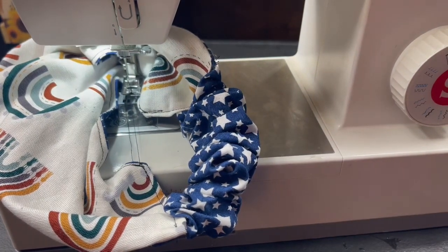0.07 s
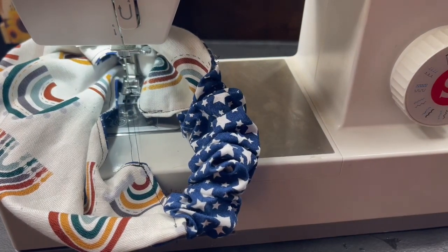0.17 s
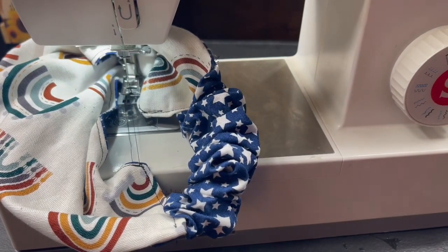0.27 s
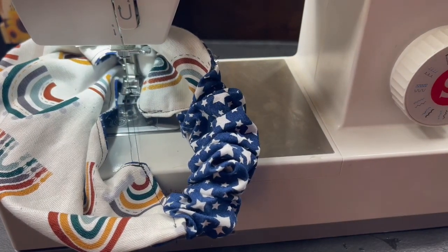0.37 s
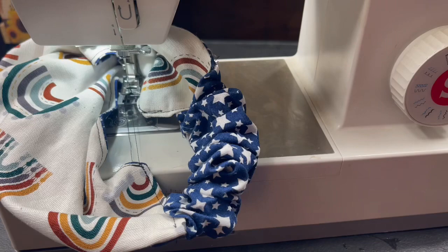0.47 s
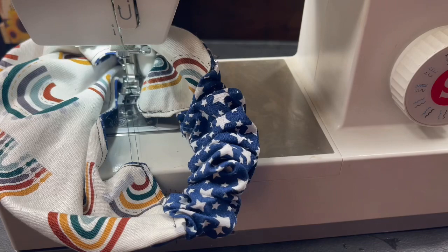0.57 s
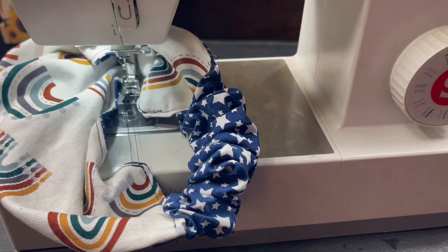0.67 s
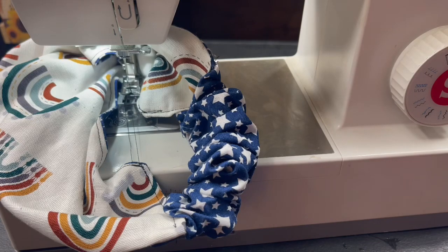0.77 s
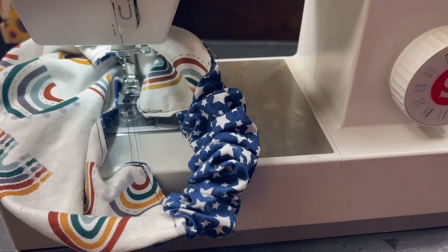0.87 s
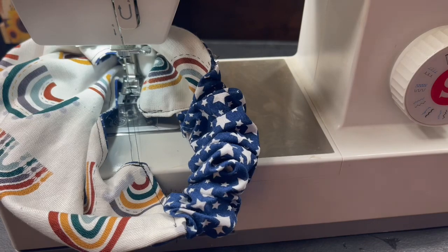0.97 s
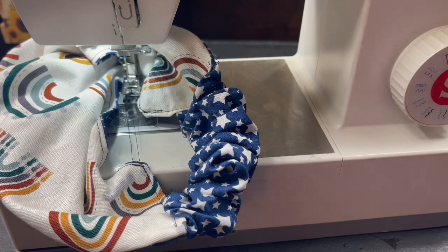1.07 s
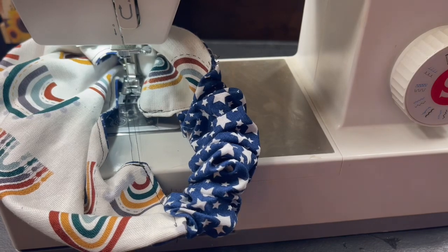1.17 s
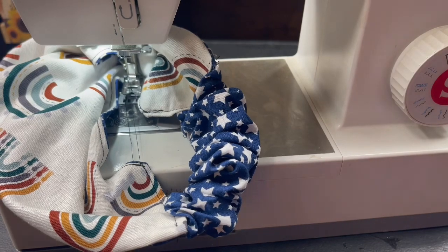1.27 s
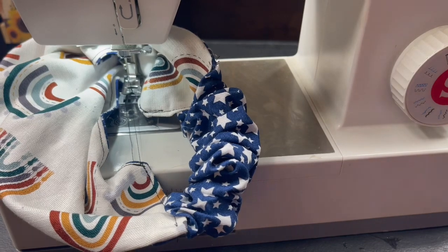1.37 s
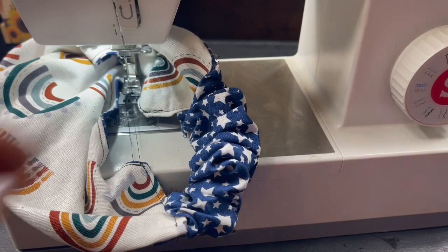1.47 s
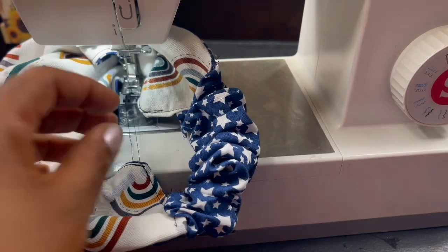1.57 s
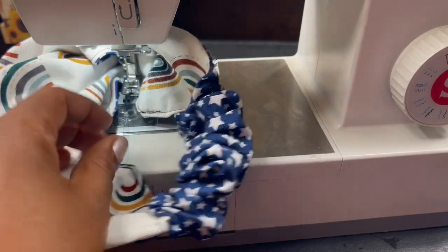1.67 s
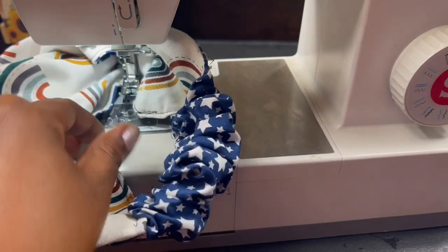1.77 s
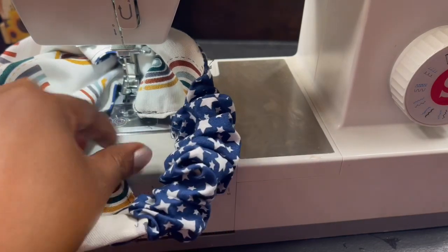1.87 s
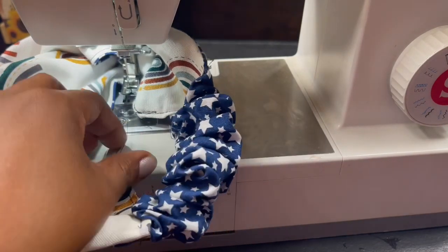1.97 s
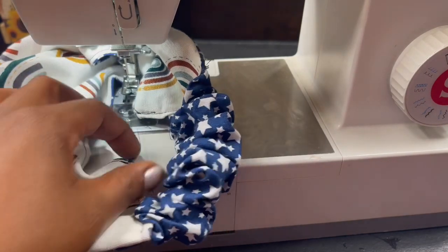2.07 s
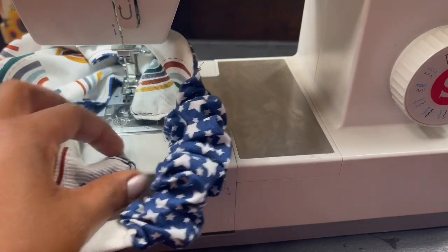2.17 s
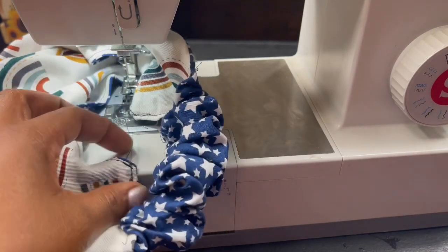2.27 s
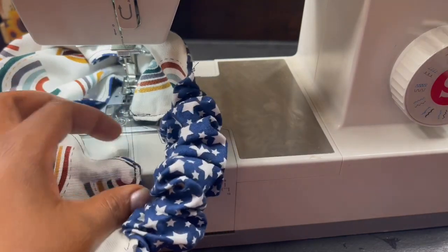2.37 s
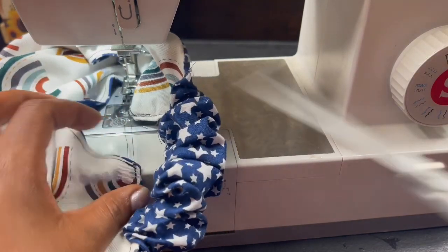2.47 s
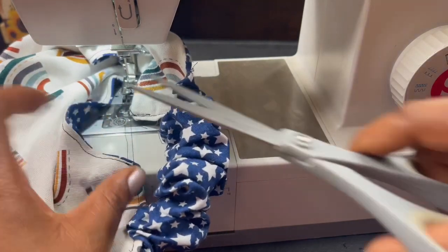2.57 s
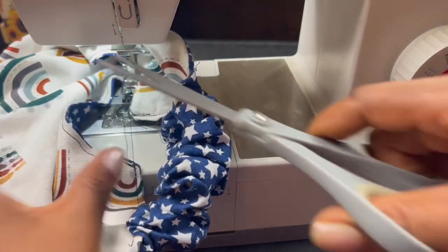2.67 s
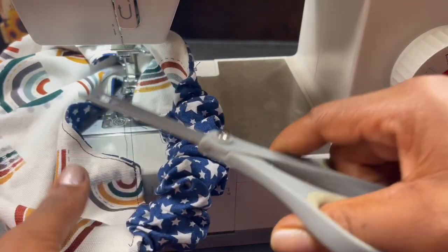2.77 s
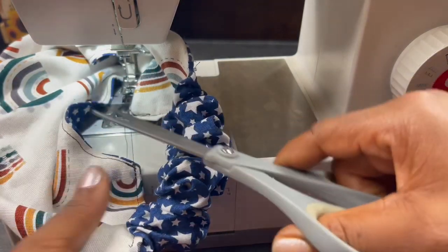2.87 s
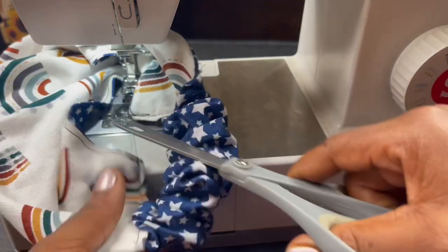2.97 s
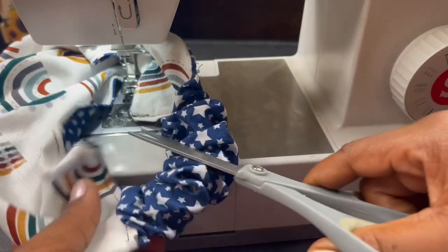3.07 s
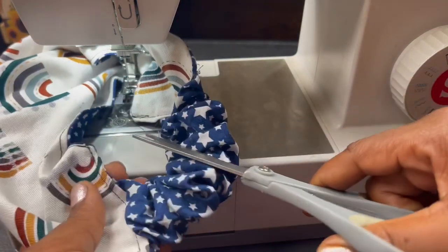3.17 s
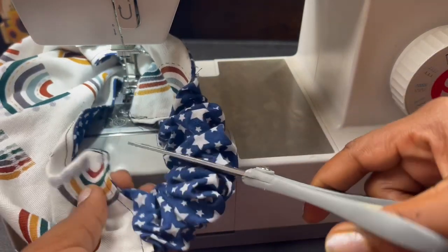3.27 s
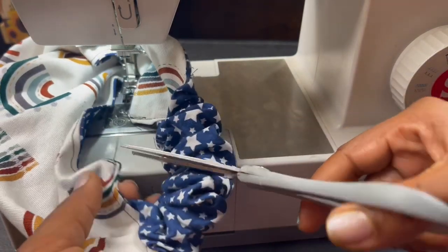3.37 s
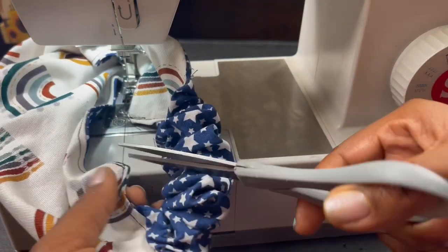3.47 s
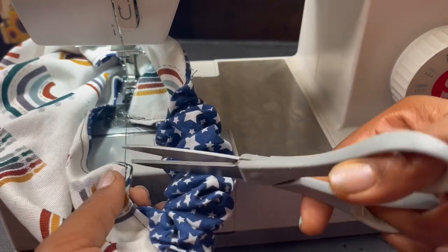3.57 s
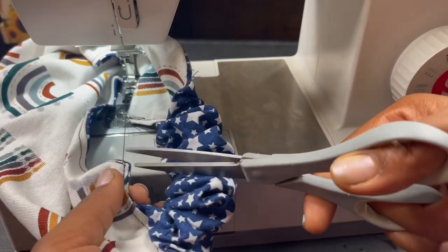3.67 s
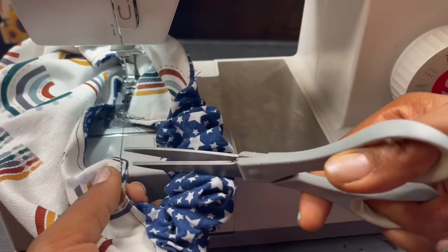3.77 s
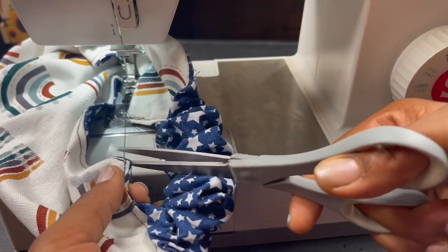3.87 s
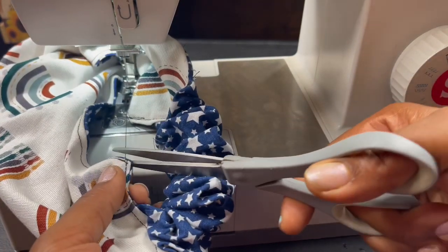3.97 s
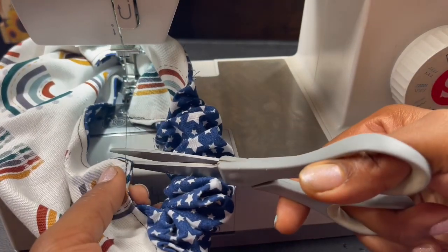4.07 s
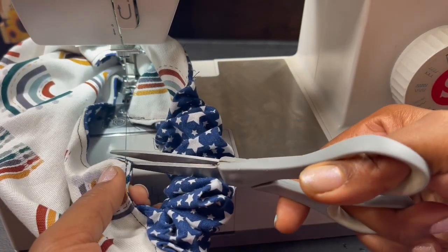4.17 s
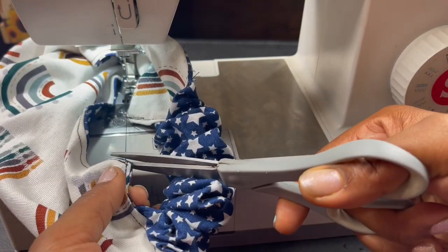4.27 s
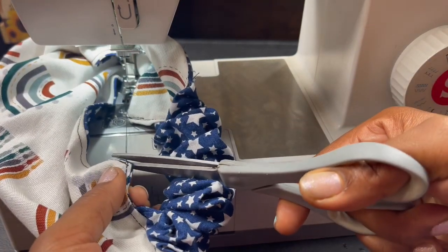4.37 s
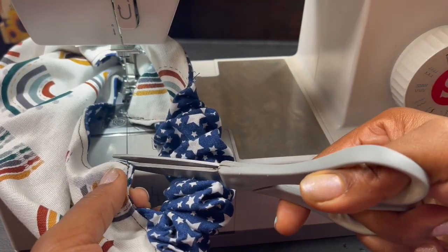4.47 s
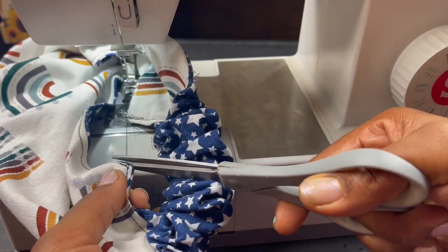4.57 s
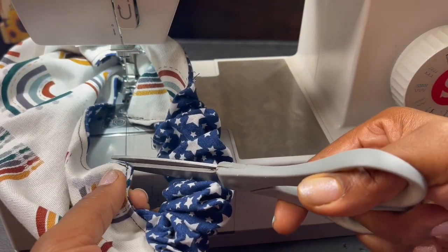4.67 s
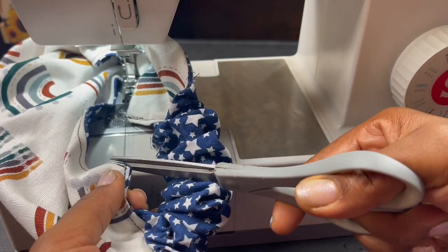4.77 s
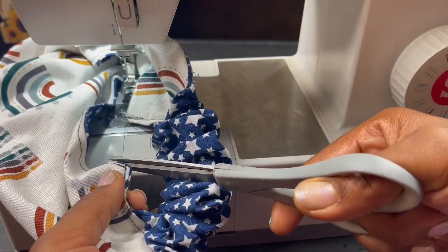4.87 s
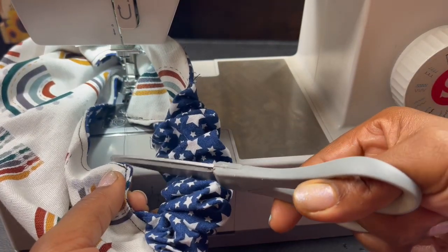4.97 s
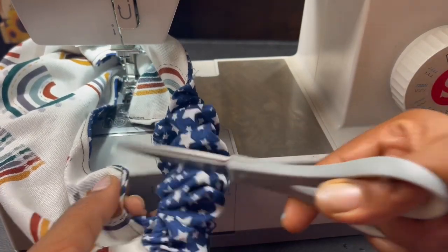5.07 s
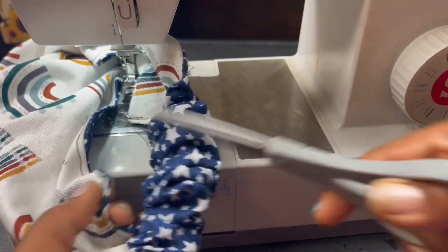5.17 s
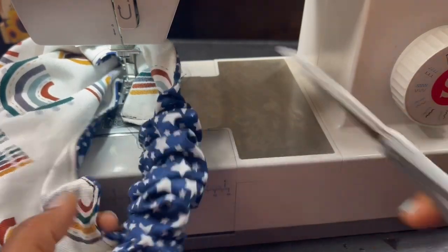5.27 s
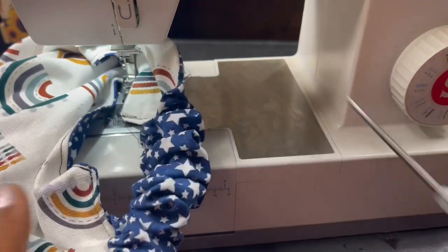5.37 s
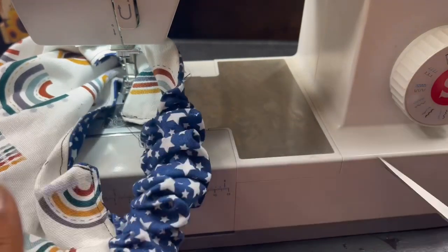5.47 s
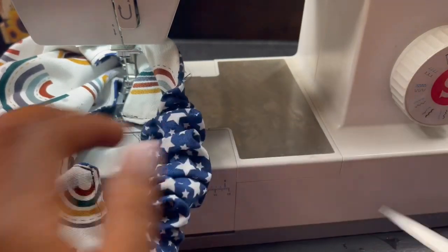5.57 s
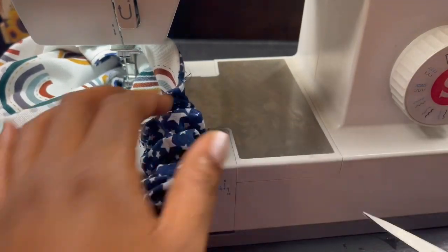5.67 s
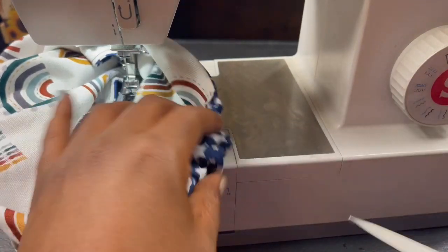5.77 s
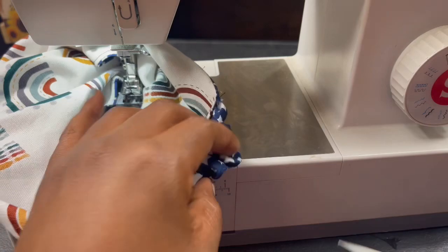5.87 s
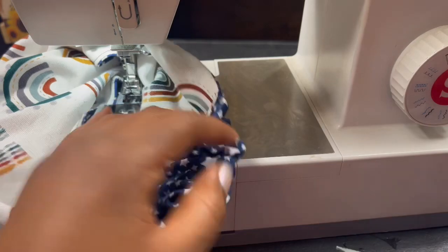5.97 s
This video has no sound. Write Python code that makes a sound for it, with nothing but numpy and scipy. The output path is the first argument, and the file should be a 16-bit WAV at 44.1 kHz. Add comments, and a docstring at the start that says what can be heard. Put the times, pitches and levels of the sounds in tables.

```python
"""Sewing machine and scissors

Close by in a small room, cloth is tugged and a sewing machine whirrs for half a second: each beat of
its drive thumps the housing and rattles loose parts. It clacks slowly to a stop. Cloth hisses over
the machine's bed as its fibres slide and catch. Steel scissors are picked up, knock on the bed,
snip the thread twice and are put down hard, making the table ring."""
import sys
import numpy as np
from scipy import signal
from scipy.fft import rfft, irfft
from scipy.io import wavfile
from scipy.ndimage import uniform_filter1d

SR = 44100
rng = np.random.default_rng(int(sys.argv[2]) if len(sys.argv) > 2 else 0)


def int16_out(signal):
    """Quantize to a 16-bit WAV file."""
    q = np.round(np.clip(np.atleast_2d(signal).T, -1, 1) * 32767)
    wavfile.write(sys.argv[1], SR, q.astype(np.int16))


N = 264936
TIME = np.arange(N) / SR
RING_TIME = TIME[:16384]  # time for one blow to die away

# Levels in dB are relative. A "mode" is a tone an object rings at; a "colour" is a filter curve.
# fade_s is the time a sound takes to fall by 60 dB.
# how fast the drive runs: time_s, beats_per_s
DRIVE_SPEED = [(.7275, 48), (.76, 51.5), (.83, 52.8), (.9, 51.5), (1.0, 51), (1.15, 50.9)]
# how hard the drive beats: time_s, thump_db, rattle_db
DRIVE_EFFORT = [(.727, -43, -55.5), (.77, -44.5, -49), (.81, -43.5, -53), (.86, -48, -50.5),
                (.905, -41, -56.5), (0.944, -45.5, -48.5), (.99, -41.5, -55.5), (1.07, -40.5, -52.5),
                (1.14, -38.5, -54.5)]
# modes of the machine's housing: pitch_hz, level_db, fade_s
HOUSING_MODES = [(50.5, -16, .1), (103, -24, 0.074), (145, -8, 0.12), (206, -1, 0.08), (246, 0, 0.081),
                 (288, -3, .09), (358, -7, 0.069), (392, -10, 0.08), (462, -8.5, 0.05), (538, -9, 0.1),
                 (690, -17, 0.08), (770, -18, .12), (860, -13, .12), (918, -12, 0.13), (1030, -10, 0.17),
                 (1090, -12, 0.17), (1225, -17, 0.1), (1400, -5, 0.018)]
# how the noise of struck plastic dies away: pitch_hz, fade_s
PLASTIC_FADE = [(150, 0.23), (500, 0.1), (1200, 0.046), (3000, 0.023), (10000, 0.066)]
# colour of a knock on the machine: pitch_hz, level_db
KNOCK_COLOUR = [(71, -16), (120, 12), (599, -2.5), (1000, -4.5), (1450, -11.5), (2000, -15), (2800, -9),
                (3300, -18), (4300, -20), (7360, -25.5), (11800, -21), (13000, -66)]
# colour of dry scrapes and snaps: pitch_hz, level_db
SCRAPE_COLOUR = [(700, 5), (1500, -6), (2500, 3.5), (4200, -1), (5600, -1), (7000, -20), (9000, -4),
                 (10000, -49), (13000, -57)]
# the part of the room's sound that differs between left and right: pitch_hz, level_db
STEREO_SPREAD = [(60, -19), (200, -14), (500, -7), (1500, -3.5), (8000, -14.5)]


def amp(db):
    """Turns decibels into a gain."""
    return 10 ** (np.asarray(db) / 20)


def unit(x):
    """Scales a sound to an average (rms) level of 1."""
    return x / np.sqrt(np.mean(x ** 2) + 1e-20)


def loudest(x, size=88):
    """Level (rms) of the loudest stretch of size samples."""
    return np.sqrt(uniform_filter1d(x ** 2, size, mode="constant").max() + 1e-20)


def curve_at(points, hz):
    """Reads between (pitch_hz, value) points on a logarithmic pitch axis."""
    pitches, values = np.transpose(points)
    return np.interp(np.log(hz + 1), np.log(pitches + 1), values)


def add(mix, start_s, sound):
    """Mixes a sound in at its start time."""
    part = mix[max(round(start_s * SR), 0):][:len(sound)]
    part += sound[:len(part)]


def coloured(x, colour, size=4096):
    """Filters a sound with no ringing ahead of it (minimum phase), so attacks stay sharp."""
    gain_db = np.maximum(curve_at(colour, abs(np.fft.fftfreq(size, 1 / SR))), -100)
    response = np.exp(np.conj(signal.hilbert(np.log(amp(gain_db)))))
    taps = np.fft.ifft(response).real
    return signal.oaconvolve(x, taps[:size // 2])[:len(x)]


def noise(colour):
    """Steady coloured noise at level 1."""
    return unit(coloured(rng.standard_normal(N), colour))


def dying_noise(fades):
    """A noise burst of energy 1 whose bands each die at their own speed; rows: pitch_hz, fade_s."""
    hz, fade_s = np.transpose(fades)
    size = len(RING_TIME)
    spectrum = rfft(rng.choice([-1., 1.], size))
    bins_hz = np.fft.rfftfreq(size, 1 / SR)
    out = np.zeros(size)
    for share, fade in zip(np.eye(len(hz)), fade_s):
        band = irfft(spectrum * curve_at(np.c_[hz, share], bins_hz), size)
        out += band * amp(-60 * RING_TIME / fade) / np.sqrt(fade)
    return out / np.linalg.norm(out)


def ring(modes, vary_db):
    """An object's fading tones, with energy 1; each blow sets them off a little differently."""
    hz, db, fade_s = np.transpose(modes)[:, :, None]
    sign = (-1) ** np.arange(len(hz))[:, None]
    level_db = db + vary_db * rng.standard_normal(db.shape) - 60 * RING_TIME / fade_s
    out = (sign * amp(level_db) * np.sin(2 * np.pi * hz * RING_TIME)).sum(0)
    return out / np.linalg.norm(out)


def strikes(rows, modes, colour, fades, noise_db, soften=0.55, split_hz=650):
    """Blows on one object: clear tones plus noise for its crowded modes; gentle blows are duller."""
    out = np.zeros(N)
    hardest_db = max(row[1] for row in rows)
    filters = [signal.butter(4, split_hz, kind, fs=SR, output="sos") for kind in ("low", "high")]
    for start_s, click_db, thump_db in rows:
        burst = coloured(dying_noise(fades), colour)
        blow = ring(modes, vary_db=1) + amp(noise_db) * burst / np.linalg.norm(burst)
        blow = coloured(blow, [(2000, 0.02), (11000, soften * (click_db - hardest_db))])
        low, high = (signal.sosfilt(band, blow) for band in filters)
        click = amp(click_db) * high / loudest(high)
        thump = amp(thump_db) * low / loudest(low, size=1100)
        add(out, start_s, click + thump)
    return out


def ticks(rows, colour, fade_s):
    """Tiny dry clicks whose low part lasts twice as long as their treble."""
    out = np.zeros(N)
    for start_s, db in rows:
        tick = coloured(dying_noise([(1000, fade_s * 2), (8000, fade_s)]), colour)
        add(out, start_s, amp(db) * tick / loudest(tick))
    return out


def pings(rows, rise_s=.002):
    """Single tones that swell quickly and die away."""
    out = np.zeros(N)
    swell = 1 - np.exp(-RING_TIME / rise_s)
    for start_s, hz, db, fade_s in rows:
        envelope = swell * amp(db - 60 * RING_TIME / fade_s)
        add(out, start_s, envelope * np.sqrt(2) * np.sin(2 * np.pi * hz * RING_TIME))
    return out


def strokes(rows, rise_share=0.46, edge_db=-16, roundness=1.62):
    """Gain over time: each stroke swells to its peak and dies away."""
    power = np.zeros(N)
    for peak_s, length_s, db in rows:
        near = abs(TIME - peak_s) < 2 * length_s
        offset = (TIME[near] - peak_s) / length_s
        from_peak = np.maximum(-offset / rise_share, offset / (1 - rise_share))
        power[near] += amp(db + edge_db * from_peak ** roundness) ** 2
    return np.sqrt(power)


def friction(rows, colour, catch_db, judder_db, catches_per_s=450):
    """Surfaces slide with a fine, unsteady hiss and now and then catch and let go."""
    sizes = amp(4.5 * np.minimum(rng.exponential(1, N), 4))
    catches = (rng.random(N) < catches_per_s / SR) * rng.choice([-1, 1], N) * sizes
    judder = amp(judder_db * unit(uniform_filter1d(rng.standard_normal(N), size=220)))
    hiss = judder * rng.standard_normal(N)
    return strokes(rows) * unit(coloured(hiss + amp(catch_db) * unit(catches), colour))


def background(air_db=-56, hum_gain_db=-3.5, waver_radians=0.93):
    """Low room noise and the wavering hum of an appliance."""
    # colour of the room noise, and the tones of the hum: pitch_hz, level_db
    air_colour = [(25, -25.5), (42, 6), (70, -4.5), (120, 0), (250, -4), (400, -17.5), (700, -17),
                  (1050, -33), (2000, -42.5), (5000, -48.5), (8500, -46.5), (12200, -40.5), (14000, -94.5)]
    hum_tones = [(43.1, -62.5), (102.3, -59), (118.4, -58.5), (236.9, -62.5)]
    shared = noise(air_colour)
    apart = amp(-0.5) * coloured(noise(air_colour), STEREO_SPREAD)
    hum = np.zeros(N)
    for hz, db in hum_tones:
        drift = unit(uniform_filter1d(uniform_filter1d(rng.standard_normal(N), 5000), 5000))
        hum += amp(db + hum_gain_db) * np.sqrt(2) * np.sin(2 * np.pi * hz * TIME + waver_radians * drift)
    return hum + amp(air_db) * np.array([shared + apart, shared - apart])


def bed_knocks():
    """Hands and scissors knock on the bed, the flat base of the machine."""
    # knocks: start_s, click_db, thump_db
    knocks = [(0.002, -87, -54), (0.053, -78, -51.5), (0.157, -61, -51), (0.264, -61, -53.5),
              (3.039, -37, -36), (3.042, -33, -44.5), (3.198, -67, -58), (3.338, -60, -75),
              (3.371, -47, -45), (3.388, -55, -53.5), (3.407, -61, -60), (4.816, -45, -54.5)]
    # modes of the bed: pitch_hz, level_db, fade_s
    bed_modes = [(150, -37.5, 0.28), (236.9, -3, 0.41), (334, 9, 0.038), (412, 7, 0.028), (627, -10, 0.12),
                 (800, -2, 0.028), (1435, 1, 0.039), (1590, -29, 0.027), (2880, -15, 0.0078),
                 (3430, -11, 0.014)]
    return amp(-1) * strikes(knocks, bed_modes, KNOCK_COLOUR, PLASTIC_FADE, noise_db=0)


def cloth():
    """Cloth rustles, scrapes over the bed and catches as it is tugged; a blade glides over it."""
    # sliding movements: peak_s, length_s, level_db
    rustles = [(.005, 0.057, -67), (.085, 0.04, -85), (.185, 0.038, -61), (.31, 0.096, -71),
               (1.62, 0.55, -72), (1.73, 0.2, -67.5), (1.89, 1, -75.5), (2.03, 0.29, -66.5),
               (2.455, 0.076, -72), (3.0, 0.34, -74.5), (3.325, 0.081, -65), (5.29, 0.39, -74.5),
               (5.8, 0.19, -61.5), (5.98, 1, -71)]
    scrapes = [(.01, 0.028, -52.5), (.054, 0.0085, -52.5), (.072, 0.084, -59), (.355, 0.02, -69),
               (.385, .1, -69)]
    tugs = [(0.5, 0.094, -45), (.556, 0.061, -48.5)]
    glides = [(2.85, 0.067, -82), (3.255, 0.11, -70), (3.322, 0.052, -65)]
    # colours of those movements: pitch_hz, level_db
    rustle_colour = [(500, 2), (1200, 4), (2500, 4), (4500, 3), (7000, 1), (8800, 6.5), (11700, 5),
                     (12600, -28), (13400, -67)]
    tug_colour = [(250, 10.5), (600, 5.5), (1000, 5.5), (1500, -3.5), (1930, 3), (2300, 2.5), (3300, -1.5),
                  (5500, -2), (7000, -6.5), (8700, -0.5), (11700, -3.5), (12600, -24), (14000, -58)]
    glide_colour = [(1500, -12), (3000, -17), (4000, -11), (4700, -2), (5500, -17), (6500, -24),
                    (12000, -12), (14000, -60)]
    # the cloth catching: start_s, click_db
    catches = [(.052, -47.5), (.445, -55), (.4635, -48), (.485, -49), (.5445, -41.5), (.561, -38.5),
               (5.978, -53.5)]
    return (friction(tugs, tug_colour, catch_db=-5, judder_db=0)
            + ticks(catches, tug_colour, fade_s=0.028)
            + amp(1.5) * friction(rustles, rustle_colour, catch_db=-20, judder_db=3.5)
            + friction(scrapes, SCRAPE_COLOUR, catch_db=-4.5, judder_db=3.5)
            + friction(glides, glide_colour, catch_db=-1, judder_db=3))


def handling():
    """Hands and cloth rub the housing, making a low rumble and a hollow rub."""
    # hand strokes: peak_s, length_s, rumble_db, rub_db
    moves = [(0.03, 0.3, -48, -59), (0.276, 0.5, -55.5, -73), (0.614, 0.047, -58, -90),
             (2.034, 0.079, -71, -52.5), (2.217, 0.24, -59.5, -73), (3.138, 0.49, -62, -72),
             (3.377, 0.26, -61, -65.5), (3.544, 0.23, -56, -59), (4.015, 0.27, -63, -62.5),
             (5.191, 0.16, -56, -52.5), (5.289, 0.035, -55, -51.5), (5.438, 0.13, -71.5, -51),
             (5.582, 0.31, -48.5, -60.5), (5.89, 0.12, -51, -62)]
    # colours of the rubbed housing: pitch_hz, level_db
    rumble_colour = [(40, -38.5), (70, 6.5), (130, -2), (240, 1.5), (330, 0), (500, -28), (1200, -64.5)]
    rub_colour = [(200, -12.5), (380, 3.5), (480, 11), (600, 0.5), (800, -5.5), (1100, -11.5), (1600, -38),
                  (3000, -35.5), (14000, -69.5)]
    rumble = strokes([(peak_s, length_s, db) for peak_s, length_s, db, _ in moves])
    rub = strokes([(peak_s, length_s, db) for peak_s, length_s, _, db in moves])
    return rumble * noise(rumble_colour) + rub * noise(rub_colour)


def steel_hits(rows, edge_fade_s=0.0024):
    """Steel meets steel: the edges click, the metal rings briefly and the joint snaps."""
    # colour of the edges' click: pitch_hz, level_db
    edge_colour = [(500, 1.5), (1300, -25), (2300, 5), (3500, -6.5), (6000, -8), (8500, -10), (11500, 7),
                   (12700, -20), (14000, -16), (15500, -7)]
    # modes of the steel and of the joint: pitch_hz, level_db, fade_s
    steel_modes = [(8050, -6, .007), (8400, -4, .009), (8750, -6, .008), (9350, -9, .008), (11050, 6, .009),
                   (11450, 2, .008), (12280, -9, .012)]
    joint_modes = [(1550, -6, .006), (2080, -5, .006), (2330, 0, .009), (3350, -9, .007)]
    out = np.zeros(N)
    for start_s, *levels_db in rows:
        edge = coloured(dying_noise([(1000, edge_fade_s), (8000, edge_fade_s)]), edge_colour)
        parts = edge, ring(steel_modes, vary_db=1.5), ring(joint_modes, vary_db=1)
        for db, part in zip(levels_db, parts):
            add(out, start_s, amp(db) * part / loudest(part))
    return out


def needle_clinks():
    """Small steel parts by the needle clink together."""
    # clinks: start_s, click_db, ring_db, snap_db
    clinks = [(0.176, -53, -89, -76), (1.532, -57, -50, -77), (1.739, -49.5, -45, -68)]
    return coloured(steel_hits(clinks), [(12000, -5), (13500, -48)])


def light_ticks():
    """Thread and metal tick lightly."""
    # ticks: start_s, click_db
    touches = [(0.178, -62), (2.638, -66.5), (3.481, -63.5), (4.682, -53.5)]
    # colour of a tick: pitch_hz, level_db
    tick_colour = [(600, 8), (1300, 10), (1750, 10.5), (2200, 12.5), (2700, 0), (4000, -9), (7000, -28),
                   (9000, -1.5), (12000, -30), (14000, -82)]
    return ticks(touches, tick_colour, fade_s=0.0062)


def thread_twangs():
    """Short twangs of thread or spring, and low thuds, as the cloth is tugged."""
    # twangs and thuds: start_s, pitch_hz, level_db, fade_s
    twangs = [(.469, 1560, -47, .035), (.484, 1880, -43, .05), (.496, 485, -38, .05),
              (.5435, 1900, -34, .04), (.555, 490, -40, .07)]
    return pings(twangs)


def machine_run(thump_gain_db=-7.5, rattle_gain_db=15, rattle_rise_s=.004, rattle_alike=.85):
    """Each beat of the drive thumps the housing and shakes loose metal, which chatters into the next."""
    # how long the loose parts chatter: pitch_hz, fade_s
    rattle_fade = [(500, .06), (2000, .046), (8000, .035)]
    # colour of the chatter: pitch_hz, level_db
    rattle_colour = [(100, -18), (250, 5), (430, 9), (620, -5), (800, -0.5), (1100, -7.5), (1500, -12),
                     (1900, -14.5), (2400, -10.5), (2900, -22), (3350, -20.5), (4200, -27.5), (6000, -38.5),
                     (12000, -39), (14000, -68)]
    speed_s, rate = np.transpose(DRIVE_SPEED)
    effort_s, thump_db, rattle_db = np.transpose(DRIVE_EFFORT)
    t = np.arange(speed_s[0], speed_s[-1], 1 / SR)
    beat_count = np.floor(np.cumsum(np.interp(t, speed_s, rate)) / SR)
    beats = t[np.diff(beat_count, prepend=-1) > 0]
    thumps, rattles = np.zeros(N), np.zeros(N)
    repeating = rattle_alike * dying_noise(rattle_fade)  # the same at every beat
    build_up = np.minimum(RING_TIME / rattle_rise_s, 1)
    for beat_s, uneven_db in zip(beats, .5 * rng.standard_normal(len(beats))):
        add(thumps, beat_s, amp(np.interp(beat_s, effort_s, thump_db)) * ring(HOUSING_MODES, vary_db=1.5))
        shake = build_up * (dying_noise(rattle_fade) + repeating)
        strength = amp(np.interp(beat_s, effort_s, rattle_db) + uneven_db)
        add(rattles, beat_s - rattle_rise_s / 2, strength * shake / np.linalg.norm(shake))
    thumps = coloured(thumps, [(100, -10), (350, -9), (520, 0), (900, -5), (2500, -17)])
    rattles = coloured(rattles, rattle_colour)
    beat_gain = np.sqrt(SR / rate.mean())  # one beat's energy is spread over its period
    return beat_gain * (amp(thump_gain_db) * thumps + amp(rattle_gain_db) * rattles)


def drive_drone(rise_s=0.012, release_s=0.044, waver_s=.04, waver_db=1.8, slip_beats=.012):
    """The drive hums on whole and half multiples of its beat rate, wavering with the uneven load."""
    # tones of the drive at full effort: beat_rate_multiple, level_db
    drone_tones = [(1, -56), (2, -61), (3, -53), (4, -45.2), (4.5, -53), (5, -44.5), (6, -58), (7, -53),
                   (7.5, -58), (9, -58), (10.5, -59), (15, -68), (20, -69), (26, -70)]
    full_effort_db = -40.5
    speed_s, rate = np.transpose(DRIVE_SPEED)
    effort_s, thump_db, _ = np.transpose(DRIVE_EFFORT)
    beat_count = np.cumsum(np.interp(TIME, speed_s, rate, left=0)) / SR
    fade_in = np.clip((TIME - speed_s[0]) / rise_s, 0, 1)
    fade_out = np.exp(-np.maximum(TIME - speed_s[-1], 0) / release_s)
    steps_s = np.arange(0, TIME[-1], waver_s)
    drone = np.zeros(N)
    for multiple, db in drone_tones:
        swell, slip = (np.interp(TIME, steps_s, rng.standard_normal(len(steps_s))) for _ in range(2))
        cycles = multiple * (beat_count + slip_beats * slip) + rng.random()
        drone += amp(db + waver_db * swell) * np.sqrt(2) * np.sin(2 * np.pi * cycles)
    effort = amp(np.interp(TIME, effort_s, thump_db) - full_effort_db)
    return fade_in * fade_out * effort * drone


def shaft_whir():
    """Shafts and belt whir as they coast, and their turning keeps the casing singing."""
    # swells of whirring and of singing: peak_s, length_s, level_db
    whirs = [(1.47, 0.8, -64)]
    sings = [(.92, .35, -65), (1.38, .95, -62.5)]
    # colour of the whir: pitch_hz, level_db
    whir_colour = [(100, 8), (280, 21), (500, 10), (700, 9), (950, 16), (1400, -1), (1900, -5), (2500, 2),
                   (4000, -35), (8000, -45)]
    # modes of the casing: pitch_hz, level_db, fade_s
    casing_modes = [(858, -6, .25), (918, -3, .25), (1030, 0, .4), (1090, -1, .35), (1225, -11, .2),
                    (1338, -11, .3)]
    singing = signal.oaconvolve(rng.standard_normal(N), ring(casing_modes, vary_db=-7))[:N]
    return strokes(whirs) * noise(whir_colour) + strokes(sings) * unit(singing)


def slowing_clacks(slack_s=0.00306, slack_db=-14, rebound_s=0.0099):
    """The slowing parts take up their slack with a light touch, clack, and fall back once, softly."""
    # clacks: start_s, click_db, thump_db
    clacks = [(1.179, -39, -39), (1.2385, -39.5, -41), (1.3023, -41.5, -40), (1.3539, -42.5, -47),
              (1.391, -43.5, -42.5), (1.419, -45, -42.5), (1.4253, -34, -33), (1.441, -48.5, -41.5),
              (1.482, -49, -48.5), (1.503, -55, -45.5), (1.523, -49, -51), (1.5381, -34, -36),
              (1.554, -64, -38.5), (1.609, -51, -48), (1.635, -48.5, -47), (1.697, -45, -43.5),
              (1.752, -53, -52), (1.787, -54.5, -51), (1.812, -41.5, -47), (1.854, -50, -52.5),
              (1.913, -46.5, -53.5), (1.977, -56, -60)]
    # metallic snaps in the two hardest clacks: start_s, click_db
    snaps = [(1.4235, -53.5), (1.5375, -52)]
    # colour of a clack: pitch_hz, level_db
    clack_colour = [(100, -6.5), (200, 2), (520, 0), (680, -11), (1020, 3.5), (1400, -8), (1850, -13.5),
                    (2550, -7.5), (3000, -18.5), (3400, -19), (5000, -44), (12000, -44), (14000, -70)]
    touches = [(s - slack_s, click + slack_db, thump + slack_db) for s, click, thump in clacks]
    rebounds = [(s + rebound_s, click - 11.5, thump - 6.5) for s, click, thump in clacks]
    blows = strikes(touches + clacks + rebounds, HOUSING_MODES, clack_colour, PLASTIC_FADE, noise_db=9)
    return amp(-6) * blows + ticks(snaps, SCRAPE_COLOUR, fade_s=0.063)


def presser_foot():
    """The foot that holds the cloth down knocks on the plate below it."""
    # knocks: start_s, click_db, thump_db
    knocks = [(1.995, -53, -76), (1.999, -44.5, -48)]
    # modes of the foot: pitch_hz, level_db, fade_s
    foot_modes = [(506, 6, .03), (1314, -11, .05), (2573, -9, .035), (3553, -15, .035), (4124, -15, .035)]
    return strikes(knocks, foot_modes, KNOCK_COLOUR, PLASTIC_FADE, noise_db=-6)


def scissor_snips():
    """The blades strike each other, and parts of the scissors sing on after a blow."""
    # blades meeting: start_s, click_db, ring_db, snap_db
    snips = [(2.295, -61, -43, -56), (4.81, -42, -67, -70), (4.8114, -39.5, -68, -41.5),
             (4.8794, -43, -39.5, -43.5), (4.8813, -34, -40, -33.5), (5.4352, -39, -21.5, -30.5)]
    # lingering tones: start_s, pitch_hz, level_db, fade_s
    after_rings = [(2.299, 8400, -50, .03), (4.826, 1235, -54, .13), (5.507, 900, -43, .11),
                   (5.509, 590, -48, .09)]
    return steel_hits(snips) + pings(after_rings)


def scissor_scrapes():
    """Edge grinds along edge, and the scissors scuff along after they knock."""
    # sliding movements: peak_s, length_s, level_db
    grinds = [(2.297, 0.011, -37.5), (2.308, 0.026, -44.5), (4.809, 0.0063, -70), (4.818, 0.024, -53),
              (4.878, 0.0098, -46)]
    scuffs = [(3.073, 0.083, -57), (3.4, 0.33, -69.5), (5.47, 0.12, -54.5), (5.645, 0.073, -60.5)]
    # colours of those movements: pitch_hz, level_db
    grind_colour = [(800, -20), (2200, -8), (4000, -2), (6000, -5.5), (7700, 1.5), (8450, 12), (9400, 2.5),
                    (11000, 8), (12300, 1), (13000, -11), (14200, -24), (15500, -8)]
    scuff_colour = [(300, -1.5), (900, 10), (1400, 1.5), (1900, -4.5), (2700, -1.5), (3700, -5.5),
                    (5000, -14), (9000, -10), (12000, -18), (13500, -54.5)]
    return (friction(grinds, grind_colour, catch_db=-4, judder_db=0)
            + friction(scuffs, scuff_colour, catch_db=-17, judder_db=4))


def table_knocks():
    """The scissors land hard on the table and settle; then a hand bumps softly on the cloth."""
    # knocks: start_s, click_db, thump_db
    knocks = [(5.4348, -19, -34.5), (5.5107, -79, -44), (5.572, -56, -54), (5.618, -64.5, -91),
              (5.648, -64.5, -71), (5.8295, -56, -57.5)]
    # modes of the table: pitch_hz, level_db, fade_s
    table_modes = [(76, -25.5, 0.41), (158.6, -18, .3), (252.3, -4, 0.39), (297, -10, .2), (354, -1, 0.11),
                   (443, -2, .11), (545, 2.5, 0.085), (586, 1, 0.077), (784, 2, 0.035), (914, -1.5, 0.03),
                   (1180, -5, 0.091), (1223, 11.5, 0.028), (1286, 8, 0.041), (1398, 10.5, 0.027),
                   (1530, -1, 0.04), (1983, -1, 0.065), (2100, -10, .09), (2190, -15, 0.1),
                   (2340, -4, 0.084), (2920, 4, 0.043), (3060, -3, .045), (3360, 9, 0.025)]
    # colour of a knock on the table: pitch_hz, level_db
    table_colour = [(50, -16), (150, 1), (350, -9), (540, -6), (690, -4), (830, -5.5), (1030, -12),
                    (1350, -3), (1750, -12.5), (2200, -3), (2600, -14), (3200, -17), (4000, -10.5),
                    (6000, -10.5), (7000, -21.5), (8300, -1.5), (9800, -18), (11300, -6), (13000, -30),
                    (14200, -63)]
    # how the noise of the struck table dies away: pitch_hz, fade_s
    table_fade = [(150, 0.6), (500, 0.07), (1200, 0.12), (3000, 0.08), (10000, 0.019)]
    return strikes(knocks, table_modes, table_colour, table_fade, noise_db=-2.5)


def in_room(x, echo_db, delay_s=.005):
    """The direct sound plus a small room's echo, most alike on both sides in the bass."""
    # how the echo dies away: pitch_hz, fade_s
    room_fade = [(120, 0.11), (400, 0.17), (1200, 0.28), (3500, 0.28), (8500, .21), (11500, 0.25),
                 (14500, .08)]
    shared = dying_noise(room_fade)
    apart = coloured(dying_noise(room_fade), STEREO_SPREAD)
    tails = np.pad([shared + apart, shared - apart], ((0, 0), (round(delay_s * SR), 0)))
    return x + amp(echo_db) * signal.fftconvolve(x[None], tails, axes=1)[:, :N]


def scene():
    """Mixes machine, scissors and cloth in stereo, each with its own amount of echo."""
    clacks = slowing_clacks()
    knocks = bed_knocks() + presser_foot() + light_ticks()
    clinks = needle_clinks()
    scrapes = scissor_scrapes()
    table = table_knocks()
    close = scissor_snips() + clinks + thread_twangs()  # right by the microphone
    return (in_room(machine_run(), echo_db=-7) + drive_drone()
            + in_room(clacks + shaft_whir(), echo_db=-5.5)
            + in_room(knocks, echo_db=-15.5)
            + in_room(close, echo_db=-22.5)
            + in_room(scrapes, echo_db=-14)
            + in_room(table, echo_db=-15.5)
            + in_room(cloth() + handling(), echo_db=-7)
            + background())


def record(dry, notch_hz=10250, notch_width_hz=330, notch_db=-24.5, low_cut_hz=36, high_cut_hz=16000):
    """Stereo placement, with deep bass, a narrow treble band and the very top filtered out."""
    # how much louder the left side is: pitch_hz, level_db
    left_louder = [(60, 1.5), (300, 0.5), (700, 1), (1400, 2), (2800, 3.5), (5500, 3.5), (9000, 0.3)]
    # how far the left side is ahead: pitch_hz, phase_radians
    left_ahead = [(60, -0.7), (700, 0.99), (2000, 0.73), (3000, 1.04), (6700, 1.04), (8500, 1.1),
                  (12000, 1.86)]
    hz = np.fft.rfftfreq(N, 1 / SR)
    left = amp(curve_at(left_louder, hz) / 2) * np.exp(.5j * curve_at(left_ahead, hz))
    notch = amp(notch_db * np.exp(-((hz - notch_hz) / notch_width_hz) ** 2))
    heard = irfft(rfft(dry) * notch * np.array([left, 1 / left]), N)
    heard = signal.sosfilt(signal.butter(6, low_cut_hz, "high", fs=SR, output="sos"), heard)
    high_cut = signal.firwin(511, high_cut_hz, window=("kaiser", 9), fs=SR)
    return signal.oaconvolve(heard, high_cut[None], "same")


dry = scene()
out = record(dry)
int16_out(out)
```